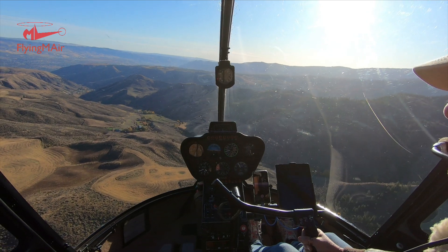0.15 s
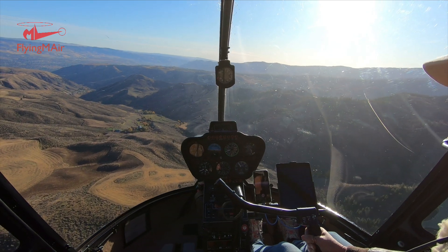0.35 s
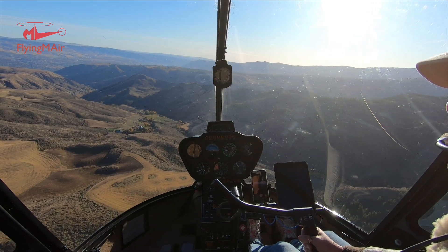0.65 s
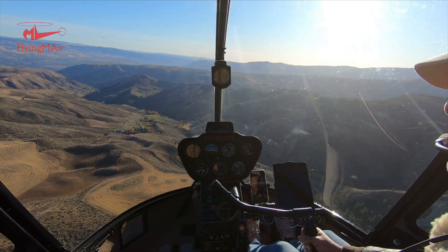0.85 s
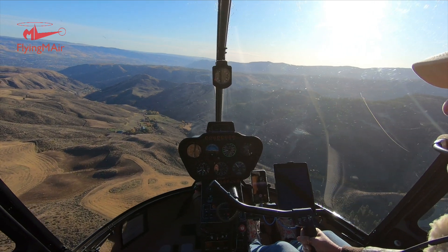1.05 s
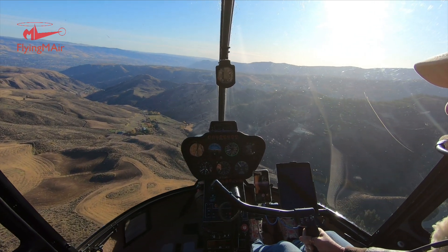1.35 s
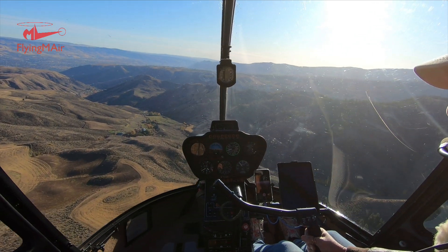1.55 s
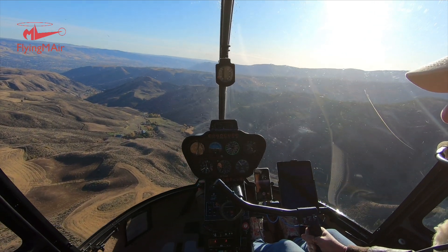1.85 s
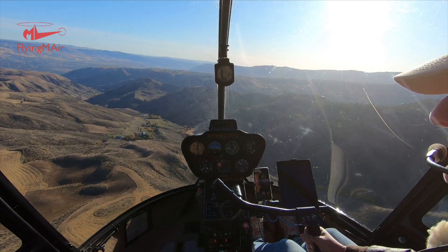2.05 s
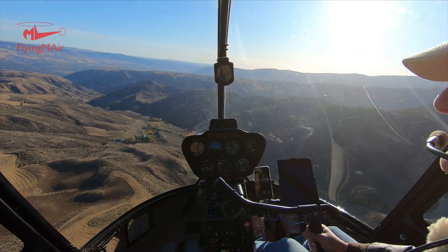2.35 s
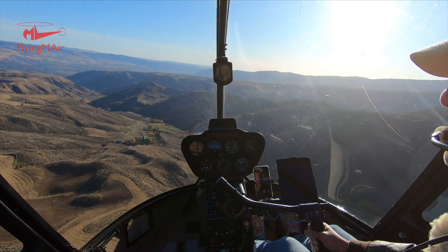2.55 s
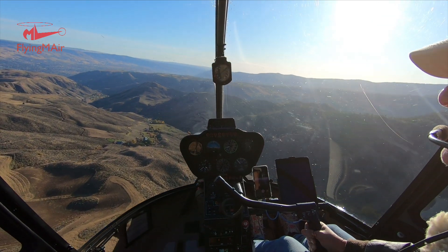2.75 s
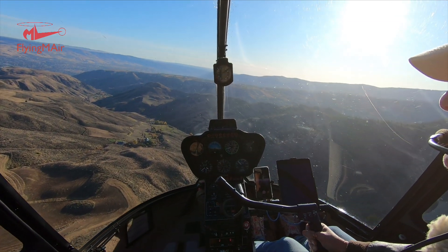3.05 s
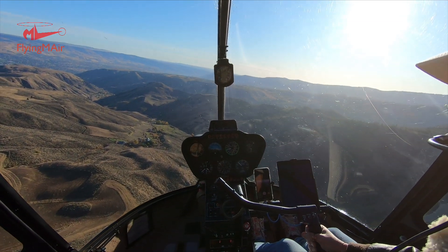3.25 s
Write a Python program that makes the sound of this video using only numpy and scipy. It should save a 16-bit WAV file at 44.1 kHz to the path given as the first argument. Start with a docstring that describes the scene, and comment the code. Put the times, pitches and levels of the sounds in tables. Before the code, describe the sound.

Helicopter rotor and engine drone steadily inside the cabin, fast thumping under a wide airy roar

```python
"""A rotor thumps steadily over a tail-rotor hum and a wide roar: the cabin of a small helicopter in flight.
Main and tail rotor are sums of sines at multiples of their blade rates; the tail partials waver.
Each blade pass adds a swell of filtered noise and thin whistles that fall in pitch.
Buffeting air moans as a wandering low tone with a band of noise around it.
Engine and slipstream are shaped noise: a low rumble and a patchy rush."""
import sys
import numpy as np
from scipy import signal
from scipy.fft import rfft, irfft
from scipy.io import wavfile
from scipy.ndimage import uniform_filter1d

SR = 44100
rng = np.random.default_rng(int(sys.argv[2]) if len(sys.argv) > 2 else 0)


def dump(signal):
    """Clip the signal to [-1, 1] and save it as 16-bit WAV at the path in sys.argv[1]."""
    limited = np.clip(np.atleast_2d(signal).T, -1, 1)
    pcm = np.round(limited * 32767).astype(np.int16)
    wavfile.write(sys.argv[1], SR, pcm)


N = 149940

# Main rotor harmonics. Each row: multiple of the blade rate, rms level in dB before the level curve.
THUMP_HARMONICS = [(1, -38), (2, -37.5), (3, -39), (4, -41.5), (5, -44)]
# Main rotor level curve. Each row: time in seconds, gain in dB.
THUMP_GAIN = [(0, -2), (.7, 1.5), (1.3, -3), (2.1, -0.5), (2.8, -0.5), (3.4, 0.5)]
# Tail rotor harmonics. Each row: multiple of the tail blade rate, rms level in dB before flutter.
TAIL_HARMONICS = [(1, -43), (2, -42), (3, -54), (4, -48.5)]
# Blade swish spectrum. Each row: frequency in Hz, relative density in dB per Hz.
SWISH_SPECTRUM = [(2500, -41), (3700, 7.5), (4500, 5), (5200, -8), (6000, -12.5), (7200, -13), (8300, -7),
                  (9500, -23), (11000, -31), (15000, -46)]
# Blade whistles. Each row: place in the blade cycle (0-1), width (standard deviation) in seconds,
# centre pitch in Hz, bandwidth in Hz, peak level in dB before the spread between passes.
WHISTLE_ROWS = [(.43, 0.004, 10030, 750, -72), (0.532, 0.0061, 8435, 776, -59),
                (.66, 0.0024, 11160, 900, -71.5), (.66, .003, 12400, 1300, -78),
                (.67, 0.0066, 8480, 2400, -59)]
# Buffeting strength. Each row: time in seconds, level in dB before BUFFET_TRIM_DB.
BUFFET_STRENGTH = [(0, -31.5), (.14, -30), (.3, -44), (.55, -41), (.68, -34), (.78, -39.5), (.93, -30.5),
                   (1.2, -35), (1.38, -29), (1.62, -36.5), (1.9, -28.5), (2.05, -32), (2.45, -30.5),
                   (2.75, -32), (3.07, -31.5), (3.24, -32), (3.4, -42.5)]
# Buffeting pitch. Each row: time in seconds, pitch in Hz before jitter.
BUFFET_PITCH = [(0.0, 168.7), (0.09, 174.3), (0.52, 151.0), (0.68, 180.3), (0.8, 163.8), (0.93, 134.6),
                (1.08, 146.4), (1.22, 130.8), (1.33, 137.3), (1.63, 192), (1.91, 157.1), (2.03, 162.6),
                (2.16, 120), (2.33, 117), (2.44, 152.8), (2.47, 136), (2.55, 83.8), (2.68, 73.1),
                (2.82, 105.9), (3.06, 100.2), (3.23, 79.44), (3.4, 90.9)]
# Cabin rumble spectrum. Each row: frequency in Hz, relative density in dB per Hz.
RUMBLE_SPECTRUM = [(4, -60), (14, -23), (25, -3), (50, -1.5), (85, -3), (130, 0), (200, -0.5), (290, -3.5),
                   (370, -16), (520, -19), (1000, -68)]
# Rumble level curve. Each row: time in seconds, level in dB.
RUMBLE_GAIN = [(0, -29), (.45, -31.5), (.7, -29), (1.3, -31.5), (1.9, -29), (2.45, -28), (2.7, -31.5),
               (3.4, -32.5)]
# Rush spectrum. Each row: frequency in Hz, relative density in dB per Hz.
ROAR_SPECTRUM = [(210, -26), (350, -1.5), (445, -5), (589, -4.5), (659, -6.5), (1000, -7.5), (1250, -10.5),
                 (1580, -10), (2240, -15.5), (2950, -16.5), (3250, -19), (4050, -20.5), (4670, -25),
                 (5300, -33.5), (5900, -40), (6900, -36.5), (7500, -38), (8300, -33.5), (9300, -42.5),
                 (10300, -49.5), (12000, -58), (13200, -61), (15500, -64), (17000, -90)]
# Rush level curve. Each row: time in seconds, gain in dB on top of ROAR_DB.
ROAR_GAIN = [(0, 0), (.5, -0.06), (1.2, 0.2), (2, 0.16), (2.8, -1.3), (3.4, -0.5)]

BLADE_HZ, TAIL_HZ = 13.504, 80.5
THUMP_AT_CYCLE, SWISH_AT_CYCLE = 0.782, 0.51  # place in the blade cycle (0-1)
REBOUND_POWER_SHARE = 0.65  # rest of the pulse's power is the symmetric dip
TAIL_WANDER_SHARE, TAIL_WANDER_HZ = 0.0042, 1.88  # rms share of the pitch
TAIL_FLUTTER_DB, TAIL_FLUTTER_HZ = -2, 5.1
SWISH_DB, SWISH_WIDTH_S, SWISH_SPREAD_DB = -50.5, 0.014, 2
PASS_JITTER_S = 0.0013  # swish and whistles
WHISTLE_FALL_HZ_PER_S, WHISTLE_SPREAD_DB = 45000, 1.9
BUFFET_TRIM_DB, BUFFET_JITTER_SHARE = -1, 0.0457
BUFFET_FLUTTER_DB, BUFFET_FLUTTER_HZ = 0.5, 25.09
BUFFET_NOISE_DB, BUFFET_OVERTONE_DB = -6.5, -15  # relative to the tone
BUFFET_WIDTH_HZ = 60
ROAR_DB, ROAR_PATCHY_DB, ROAR_FLICKER_DB = -34, 0.7, 0.01
CUTOFF_HZ = 15700
T = np.arange(N) / SR  # seconds


def amp(db):
    """Decibels to gain."""
    return 10 ** (np.asarray(db) / 20)


def unit(x):
    """Scales to an rms of 1."""
    return x / np.sqrt(np.mean(x ** 2) + 1e-20)


def curve(rows):
    """Interpolates a time table at every sample."""
    rows = np.array(rows)
    return np.interp(T, rows[:, 0], rows[:, 1])


def read_spectrum(points, hz):
    """Interpolates a spectrum table in dB on a log-frequency axis."""
    point_hz, db = np.transpose(points)
    return np.interp(np.log(hz + 1), np.log(point_hz + 1), db)


def noise(points):
    """Gaussian noise filtered to the given spectrum, rms 1."""
    hz = np.fft.rfftfreq(N, 1 / SR)
    spectrum = rfft(rng.standard_normal(N)) * amp(read_spectrum(points, hz))
    return unit(irfft(spectrum, N))


def drift(rate_hz):
    """Smooth random movement, rms 1, rolling off around rate_hz."""
    hz = np.fft.rfftfreq(N, 1 / SR)
    lowpass = (hz > 0) / (1 + (hz / rate_hz) ** 4)
    return unit(irfft(rfft(rng.standard_normal(N)) * lowpass, N))


def narrow_noise(phase, width_hz):
    """Noise band around a moving carrier: two random drifts on its cosine and sine, rms 1."""
    in_phase = drift(width_hz / 2) * np.cos(phase)
    quadrature = drift(width_hz / 2) * np.sin(phase)
    return unit(in_phase + quadrature)


def main_rotor():
    """Each blade sends a dip of pressure through the cabin, followed by a rebound."""
    angle = 2 * np.pi * (T * BLADE_HZ - THUMP_AT_CYCLE)
    pulses = np.zeros(N)
    for k, db in THUMP_HARMONICS:
        rebound = np.sqrt(REBOUND_POWER_SHARE) * np.sin(k * angle)
        dip = -np.sqrt(1 - REBOUND_POWER_SHARE) * np.cos(k * angle)
        pulses += amp(db) * (rebound + dip)
    return np.sqrt(2) * amp(curve(THUMP_GAIN)) * pulses


def tail_rotor():
    """A hum at multiples of the tail blade rate whose partials waver in the turbulent air."""
    rate_hz = TAIL_HZ * (1 + TAIL_WANDER_SHARE * drift(TAIL_WANDER_HZ))
    cycles = np.cumsum(rate_hz) / SR
    hum = np.zeros(N)
    for k, db in TAIL_HARMONICS:
        level = amp(db + TAIL_FLUTTER_DB * drift(TAIL_FLUTTER_HZ))
        hum += level * np.sin(2 * np.pi * (k * cycles + rng.random()))
    return np.sqrt(2) * hum


def per_blade(place, width_s, spread_db):
    """Seconds from the blade pass in each cycle, and a bell-shaped swell there; timing and level vary."""
    count = int(N / SR * BLADE_HZ) + 2
    chance = rng.standard_normal((count, 2))
    blade = (T * BLADE_HZ).astype(int)
    pass_s = (blade + place) / BLADE_HZ + PASS_JITTER_S * chance[blade, 0]
    since_s = T - pass_s
    bell = np.exp(-0.5 * (since_s / width_s) ** 2)
    return since_s, amp(spread_db * chance[blade, 1]) * bell


def swish():
    """Each blade brings a soft swell of hiss with thin whistles on top."""
    _, swell = per_blade(SWISH_AT_CYCLE, SWISH_WIDTH_S, SWISH_SPREAD_DB)
    hiss = amp(SWISH_DB) * swell * noise(SWISH_SPECTRUM)
    return hiss + sum(whistle(*row) for row in WHISTLE_ROWS)


def whistle(place, width_s, pitch_hz, band_hz, db):
    """A breathy narrow noise band that falls in pitch as the blade sweeps by."""
    since_s, swell = per_blade(place, width_s, WHISTLE_SPREAD_DB)
    phase = 2 * np.pi * np.cumsum(pitch_hz - WHISTLE_FALL_HZ_PER_S * since_s) / SR
    return amp(db) * swell * narrow_noise(phase, band_hz)


def buffet():
    """Eddies shed along the cabin: an unsteady low tone inside a band of noise, with a noisy overtone."""
    pitch_hz = curve(BUFFET_PITCH) * (1 + BUFFET_JITTER_SHARE * drift(BUFFET_FLUTTER_HZ))
    phase = 2 * np.pi * np.cumsum(pitch_hz) / SR
    tone = unit(amp(BUFFET_FLUTTER_DB * drift(BUFFET_FLUTTER_HZ)) * np.sin(phase))
    band = narrow_noise(phase, BUFFET_WIDTH_HZ)
    overtone = unit(drift(BUFFET_WIDTH_HZ / 2) * np.sin(2 * phase))
    moan = tone + amp(BUFFET_NOISE_DB) * band + amp(BUFFET_OVERTONE_DB) * overtone
    return amp(BUFFET_TRIM_DB + curve(BUFFET_STRENGTH)) * moan


def roar():
    """Engine and slipstream through the cabin walls: a rumble and a wide, slightly patchy rush."""
    frames, hz = N // 128 + 5, np.fft.rfftfreq(512, 1 / SR)
    real, imag, patches = rng.standard_normal((3, frames, len(hz)))
    patches = uniform_filter1d(patches, size=20, axis=0)  # smooth in time
    patches = unit(uniform_filter1d(patches, size=6, axis=1))  # smooth in frequency
    flicker = unit(uniform_filter1d(rng.standard_normal(frames), size=5))[:, None]
    db = read_spectrum(ROAR_SPECTRUM, hz) + ROAR_PATCHY_DB * patches + ROAR_FLICKER_DB * flicker
    bins = (real + 1j * imag) * amp(db)
    _, rush = signal.istft(bins.T, nperseg=512, noverlap=384)
    rush = amp(ROAR_DB + curve(ROAR_GAIN)) * unit(rush[:N])
    rumble = amp(curve(RUMBLE_GAIN)) * noise(RUMBLE_SPECTRUM)
    return rush + rumble


def scene():
    """All sources summed at one microphone in the cabin."""
    return (main_rotor() + tail_rotor() + swish() + buffet() + roar())[None]


def record(dry):
    """The recorder's band limit: a linear-phase low-pass."""
    lowpass = signal.firwin(511, CUTOFF_HZ, window=("kaiser", 9), fs=SR)
    return signal.oaconvolve(dry, lowpass[None], "same")


dry = scene()
out = record(dry)
dump(out)
```